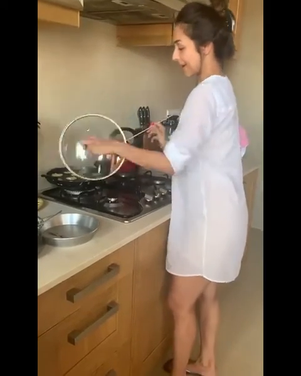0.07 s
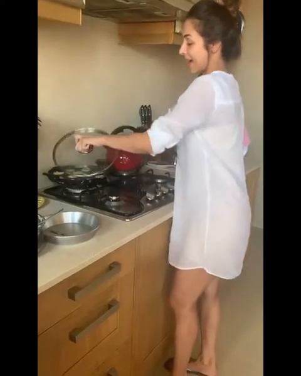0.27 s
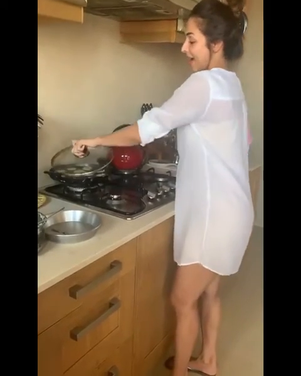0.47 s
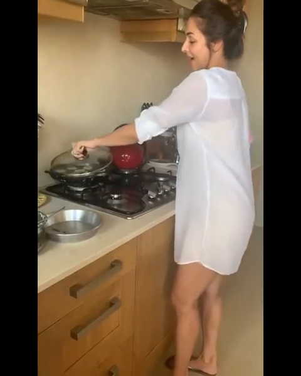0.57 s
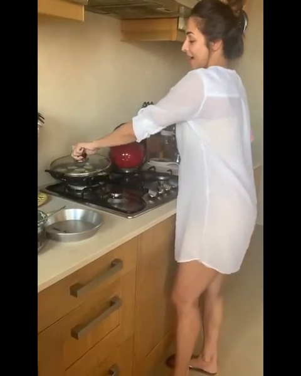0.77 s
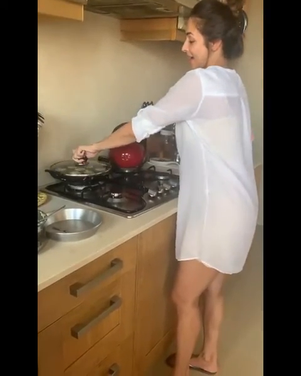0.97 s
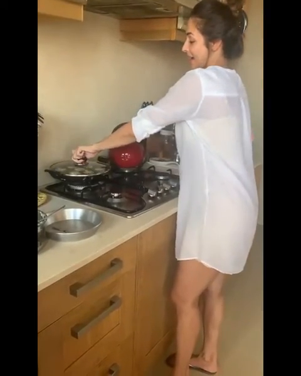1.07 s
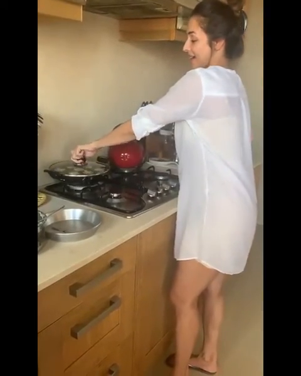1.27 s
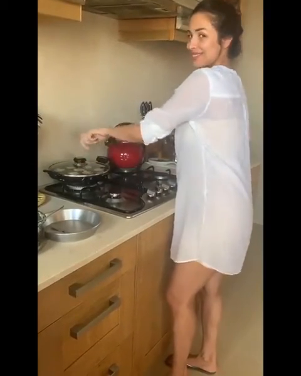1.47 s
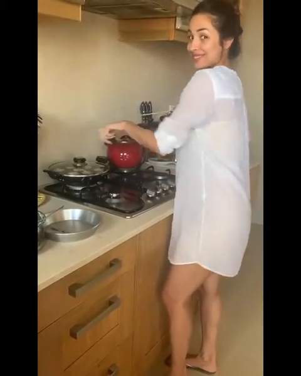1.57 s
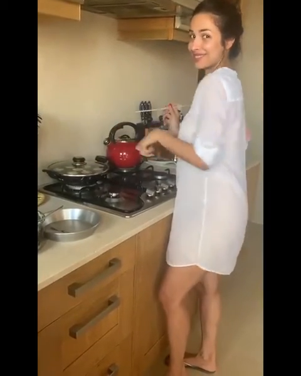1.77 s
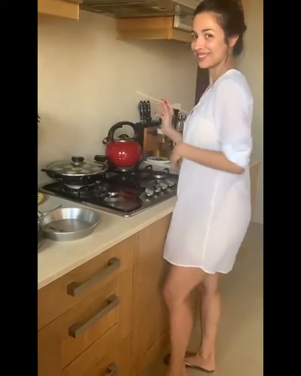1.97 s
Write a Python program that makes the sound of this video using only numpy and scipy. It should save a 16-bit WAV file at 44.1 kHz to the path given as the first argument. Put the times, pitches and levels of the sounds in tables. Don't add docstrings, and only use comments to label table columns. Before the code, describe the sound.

Bright frying sizzle on a gas stove, choked off as a glass lid knocks and rattles into place

```python
import sys
import numpy as np
from scipy import signal
from scipy.fft import rfft, irfft, next_fast_len
from scipy.io import wavfile
from scipy.ndimage import uniform_filter1d

SR = 44100
rng = np.random.default_rng(int(sys.argv[2]) if len(sys.argv) > 2 else 0)


def log_audio(samples):
    frames = np.atleast_2d(samples).T
    limited = np.clip(frames, -1, 1)
    pcm = np.round(limited * 32767).astype(np.int16)
    wavfile.write(sys.argv[1], SR, pcm)


def gain_from_decibels(decibels):
    exponent = np.asarray(decibels, float) / 20
    return 10 ** exponent


N = 88508


def evened(x):
    return x / np.sqrt(np.mean(x ** 2) + 1e-20)


def read(points, hz):
    f, value = np.transpose(points)
    return np.interp(np.log(hz + 1), np.log(f + 1), value)


def control(rows):
    s, db = np.transpose(rows)
    return gain_from_decibels(np.interp(np.arange(N) / SR, s, db))


def colour(x, gain_of_hz):
    size = next_fast_len(N + 8192)
    gain = gain_of_hz(np.fft.rfftfreq(size, 1 / SR))
    return irfft(rfft(x, size) * gain, size)[..., :N]


def smoothed(x, bins, frames):
    return uniform_filter1d(uniform_filter1d(x, bins, axis=-2), frames, axis=-1)


def hiss(patchy_db, flicker_db):
    frames = N // 128 + 5
    z = rng.standard_normal((2, 257, frames)) + 1j * rng.standard_normal((2, 257, frames))
    patches = evened(smoothed(rng.standard_normal((257, frames)), 7, 20))
    flicker = evened(uniform_filter1d(rng.standard_normal(frames), 10))
    z = z * gain_from_decibels(patchy_db * patches + flicker_db * flicker)
    return evened(signal.istft(z, nperseg=512, noverlap=384)[1][:, :N])


def fizz():
    # time in seconds, level in dB.
    escape = [(0.0, -35.5), (0.09, -35), (0.33, -37.5), (0.55, -43), (0.61, -39), (0.93, -44),
              (1.26, -56.5), (1.29, -51), (1.54, -58), (1.62, -54.5), (1.68, -58), (1.8, -59.5), (2.0, -60)]
    # frequency in Hz, level in dB per Hz.
    open_pan = [(1000, -20), (2000, -12), (2700, -5), (3600, -7), (4500, -2), (6500, -2.5), (9000, 0),
                (11000, -3)]
    pops_per_s, pop_spread_db, pop_share_db = 5000, 2.5, -8
    sizes = 16
    u = np.arange(128)
    pops = np.zeros((2, N))
    for hz in np.geomspace(1200, 9500, sizes):
        strength = gain_from_decibels(pop_spread_db * np.minimum(rng.exponential(1, N), 5))
        strength = strength * (rng.random(N) < pops_per_s / sizes / SR)
        grain = np.sin(2 * np.pi * hz * u / SR) * np.exp(-u * hz / SR / 4) * hz / 3000
        pops += signal.oaconvolve(strength * rng.standard_normal((2, N)), grain[None], axes=1)[:, :N]
    mix = hiss(patchy_db=2.14, flicker_db=0.0) + gain_from_decibels(pop_share_db) * evened(pops)
    return gain_from_decibels(4.5) * control(escape) * evened(colour(mix, lambda hz: gain_from_decibels(read(open_pan, hz))))


def steam():
    # frequency in Hz, bandwidth in Hz, level in dB.
    cavity = [(930, 140, -4), (1500, 250, -9), (1880, 220, 0), (2200, 150, -10), (2680, 120, -17)]
    # time in seconds, level in dB.
    steam_level = [
        (0, -61.5),
        (.6, -54.5),
        (1.3, -47.5),
        (1.75, -55),
        (1.9, -47),
        (2.01, -46),
    ]

    def resonance(hz):
        power = sum(gain_from_decibels(2 * db) / (1 + (2 * (hz - f) / width) ** 2) ** 2 for f, width, db in cavity)
        return np.sqrt(power)

    air = hiss(patchy_db=1.2, flicker_db=.6)
    return control(steam_level) * evened(colour(air, resonance))


def burner():
    # frequency in Hz, level in dB per Hz.
    roar = [(26, -48), (45, 2.5), (183, -4), (508, -13.5), (943, -10), (1010, -11.5), (1850, -10.5),
            (3500, -27.5), (4550, -58), (7700, -120)]
    air = hiss(patchy_db=.9, flicker_db=.3)
    return gain_from_decibels(-46) * evened(colour(air, lambda hz: gain_from_decibels(read(roar, hz))))


def ringing(modes):
    t = np.arange(SR // 2) / SR
    total = 0
    for k, (hz, db, t60) in enumerate(modes):
        phase = np.array([[0], [k * 7.4]])
        total = total + gain_from_decibels(db - 60 * t / t60) * np.sin(2 * np.pi * hz * t + phase)
    return total


def lid():
    # time in seconds, pan level in dB, then stove, grate and glass levels
    # in dB against the pan.
    contacts = [(0.585, -44, -18, 2, 13), (0.665, -43, 10, 7, -30), (0.736, -34, -5, -3.5, 5),
                (0.799, -37.5, 1, -10, -0.5), (0.925, -28, -29, -11, 5.5),
                (0.9391, -24.5, -14.5, -13, -8.5), (0.970, -32, -2.5, 2, -3.5),
                (0.987, -27.5, -12, -6.5, -5), (1.010, -36, 0.5, -23, -12.5), (1.0956, -27.5, -27, -4, 7.5),
                (1.102, -27.5, 2, -10, -3.5), (1.1087, -23, -39, 1.5, -3), (1.1156, -22.5, -26.5, -6, -2.5),
                (1.136, -33.5, -24, -39, 4), (1.163, -32.5, 5, -10, -3), (1.185, -28.5, -21, -15, -12),
                (1.231, -42, 14.5, -12, -5), (1.439, -37.5, -14, 5, -11), (1.453, -38.5, 4.5, -4, -11.5),
                (1.482, -43, -10, -6, 1), (1.505, -46, -5, 16.5, -7.5), (1.534, -38, -23, 2, -6),
                (1.552, -50, 5, 2, -21)]
    # frequency in Hz, level in dB, 60 dB decay time in seconds.
    stove = [(83.85, -7.5, 0.58), (100.8, 5, 0.15)]
    grate = [(216, -5, 0.097), (280.6, 8.5, 0.042), (319, 5, 0.058)]
    pan = [(403.7, 6, 0.05), (433, 4, 0.08), (481, -6.5, 0.13), (547.6, -1, 0.084), (652, -4, 0.053)]
    glass = [(938, -0.5, 0.024), (1060, -7, 0.027), (1235, -4, 0.03), (1425, 2.5, 0.026),
             (1776, -8.5, 0.033), (2345, -6, .03), (2495, -10, 0.055), (2918, -7, 0.035),
             (3460, -24.5, 0.0072), (4140, -9.5, 0.01)]
    chatter_s, rim_chatter_s, chatter_per_s = 0.043, 0.032, 930
    body_chatter, rim_chatter = .05, .3
    blow_s, stove_rise_s, body_rise_s = 0.00032, 0.0048, 0.0024
    crack_db, crack_t60_s, crack_band_hz = 2, 0.07, [900, 4050]

    u = np.arange(round(.12 * SR))
    fade = np.exp(-u / SR / np.array([[chatter_s], [chatter_s], [chatter_s], [rim_chatter_s]]))
    share = np.array([[body_chatter], [body_chatter], [body_chatter], [rim_chatter]])
    drive = np.zeros((4, N + len(u)))
    jolt = np.zeros(N)
    for s, pan_db, stove_db, grate_db, glass_db in contacts:
        touches = rng.random(len(u)) < chatter_per_s / SR
        hits = share * touches * rng.standard_normal(len(u)) * fade
        hits[:, 0] = .7
        hits = hits * 2 / np.linalg.norm(hits, axis=1, keepdims=True)
        at = round(s * SR)
        levels_db = pan_db + np.array([[stove_db], [grate_db], [0], [glass_db]])
        drive[:, at:at + len(u)] += gain_from_decibels(levels_db) * hits
        jolt[at] = gain_from_decibels(pan_db + glass_db)

    blow = np.hanning(round(blow_s * SR) + 3)
    softened = signal.fftconvolve(drive[:3], blow[None] / blow.sum(), axes=1)
    drive[:3] = softened[:, :drive.shape[1]]

    t = np.arange(SR // 2) / SR
    crack_filter = signal.butter(3, crack_band_hz, "band", fs=SR)
    crack = signal.lfilter(*crack_filter, rng.standard_normal((2, N)))
    crack = crack * signal.fftconvolve(jolt, gain_from_decibels(crack_db - 60 * t / crack_t60_s))[:N]

    stove_rise = 1 - np.exp(-t / stove_rise_s)
    body_rise = 1 - np.exp(-t / body_rise_s)
    bodies = [ringing(stove) * stove_rise, ringing(grate) * body_rise,
              ringing(pan) * body_rise, ringing(glass)]
    rings = sum(signal.fftconvolve(d[None], body, axes=1) for d, body in zip(drive, bodies))
    return gain_from_decibels(-11.5) * (rings[:, :N] + crack)


def kitchen(x):
    # frequency in Hz, 60 dB decay time in seconds.
    decay = [(100, 0.49), (400, 0.61), (1500, 0.31), (4000, 0.67)]
    hz, t, z = signal.stft(rng.standard_normal((2, SR)), SR, nperseg=256)
    fall = gain_from_decibels(-60 * t / read(decay, hz)[:, None])
    tail = signal.istft(z * fall, SR, nperseg=256)[1]
    return signal.fftconvolve(x[None], tail / np.linalg.norm(tail[0]), axes=1)[:, :N]


def scene():
    knocks = lid()
    mid, side = fizz() + steam() + burner() + knocks + gain_from_decibels(-5) * kitchen(knocks[0])
    return np.array([mid + side, mid - side])


def port_pair(mid, side):
    # frequency in Hz, level in dB.
    side_width = [(60, -36), (190, -19), (330, -13), (600, 0), (1100, -5.5), (3000, 0.5), (6300, 0),
                  (7600, -5), (8300, -27)]
    lean_db, notch_db, notch_hz, notch_wide_hz = -14.5, -8, 5200, 600
    edge_hz, side_edge_hz, rumble_cut_hz = 9700, 8300, 38
    lean = colour(mid, lambda hz: gain_from_decibels(lean_db) / (1 + (np.log((hz + 1) / 250) / 0.59) ** 4))
    side = colour(side, lambda hz: gain_from_decibels(read(side_width, hz)) * (hz < side_edge_hz)) - lean

    def notch(hz):
        return gain_from_decibels(notch_db * np.exp(-((hz - notch_hz) / notch_wide_hz) ** 2)) * (hz < edge_hz)

    mid = colour(mid, notch)
    mid = colour(mid, lambda hz: 1 / (1 + (rumble_cut_hz / (hz + 1)) ** 12))
    return np.array([mid, side])


def thinned(pair):
    # start in seconds, end in seconds.
    shed_times = [
        (1.19, 1.24),
        (1.77, 1.8),
        (1.85, 1.91),
        (1.97, 2.01),
    ]
    shed_hz, thin_from_hz, spare_db_per_khz = 9200, 2800, 7
    band_drop_db, band_wander_db, bin_drop_db = -4.6, 4.5, -2
    frame = dict(window="cosine", nperseg=2048, noverlap=1024)
    hz, t, z = signal.stft(pair, SR, **frame)
    size = abs(z)
    mask = np.sqrt(smoothed(size ** 2, 40, 2).max(0))
    mask = mask * gain_from_decibels(-spare_db_per_khz * np.maximum(thin_from_hz - hz, 0) / 1000)[:, None]
    band = np.sqrt(smoothed(size ** 2, 8, 2))
    wander = evened(smoothed(rng.standard_normal(z.shape), 10, 2))
    band_heard = band > mask * gain_from_decibels(band_drop_db + band_wander_db * wander)
    bin_heard = size > mask * gain_from_decibels(bin_drop_db)
    shed = sum((t > start) & (t < end) for start, end in shed_times) * (hz > shed_hz)[:, None]
    keep = band_heard & bin_heard & (shed == 0)
    return signal.istft(z * keep, SR, **frame)[1][:, :N]


def top_cut(x):
    return signal.sosfilt(signal.butter(12, 10850, fs=SR, output="sos"), x)


def record(dry):
    mid, side = (dry[0] + dry[1]) / 2, (dry[0] - dry[1]) / 2
    mid, side = thinned(port_pair(mid, side))
    return top_cut(np.array([mid + side, mid - side]))


dry = scene()
out = record(dry)
log_audio(out)
```